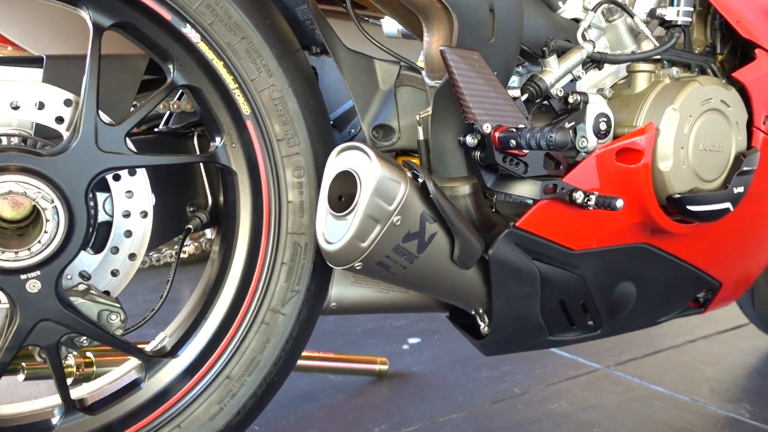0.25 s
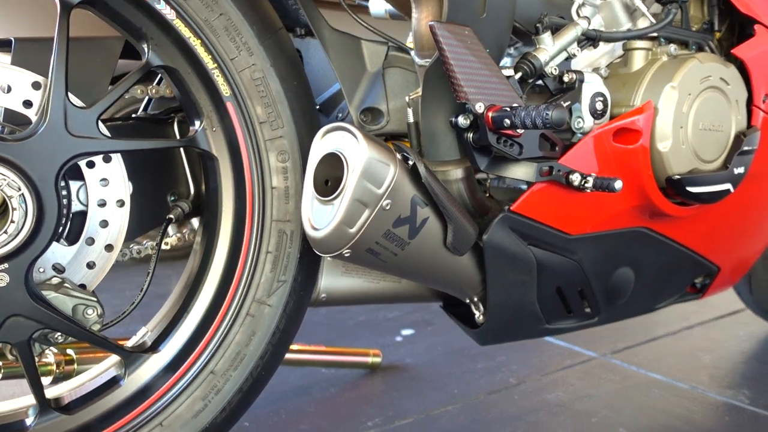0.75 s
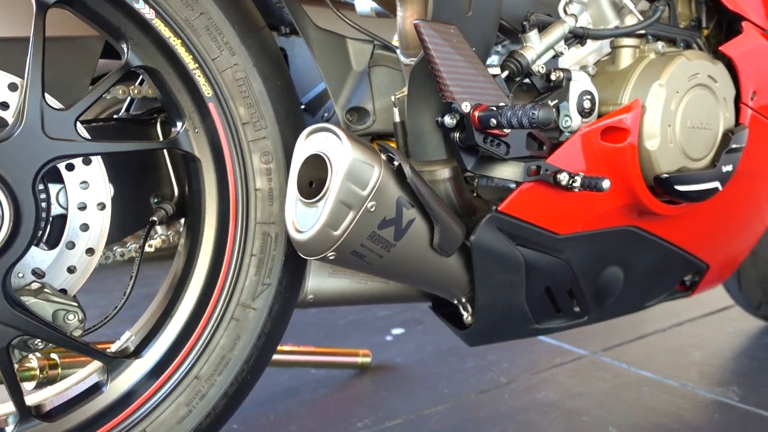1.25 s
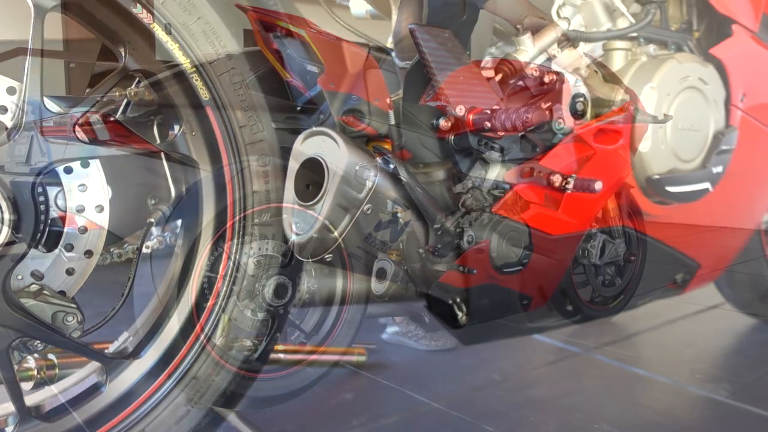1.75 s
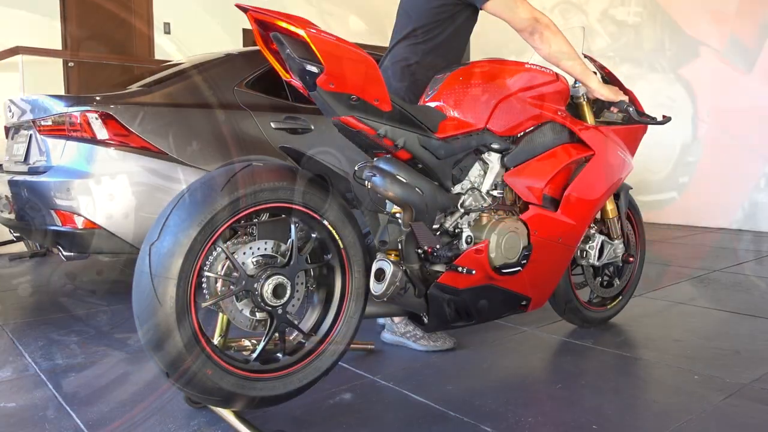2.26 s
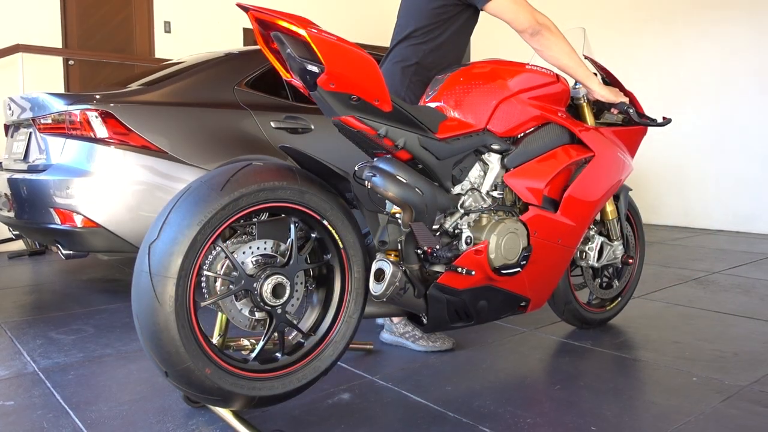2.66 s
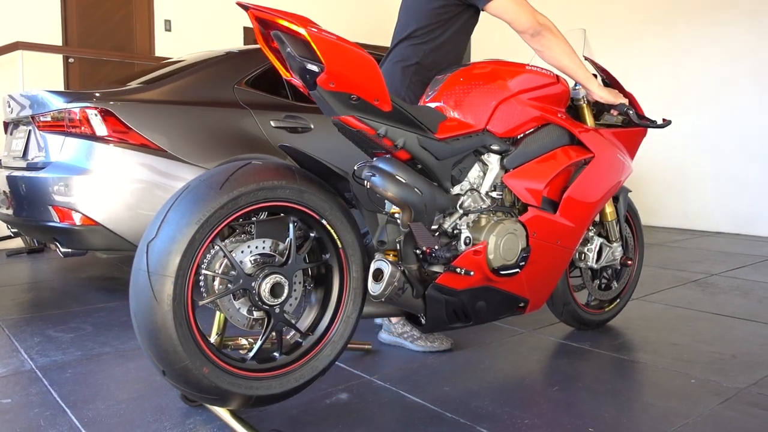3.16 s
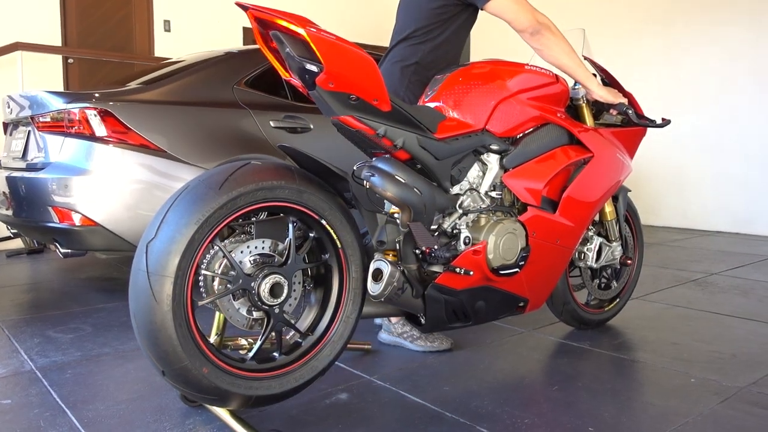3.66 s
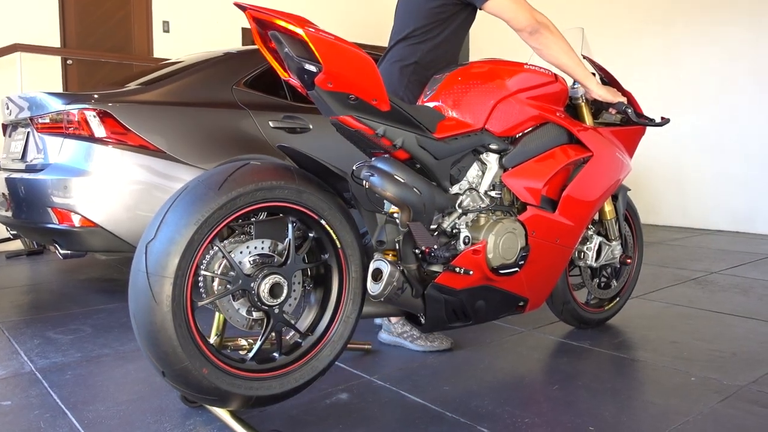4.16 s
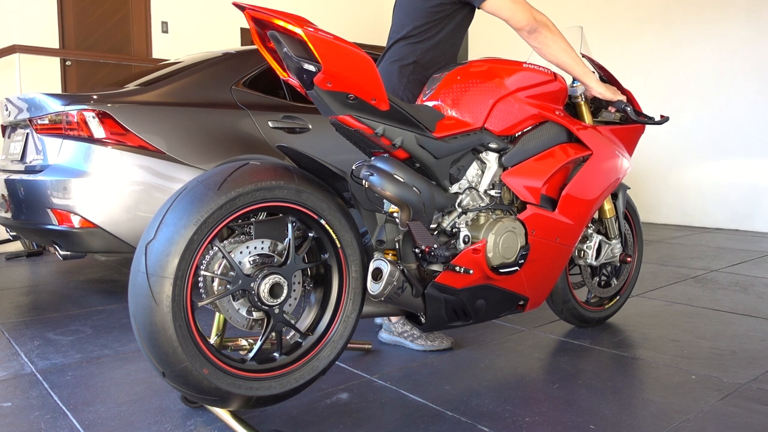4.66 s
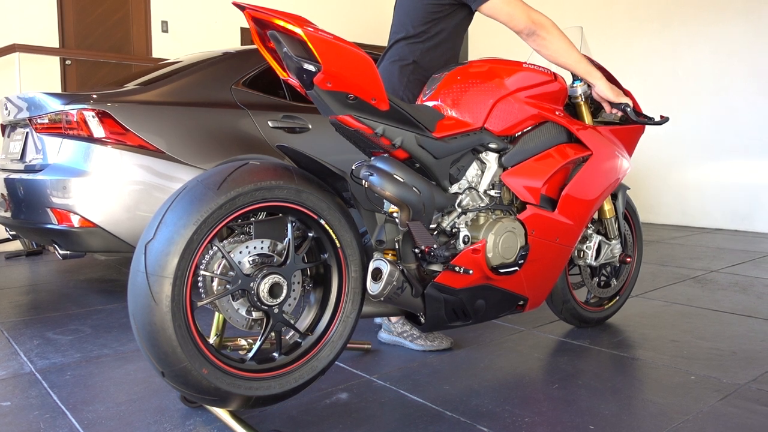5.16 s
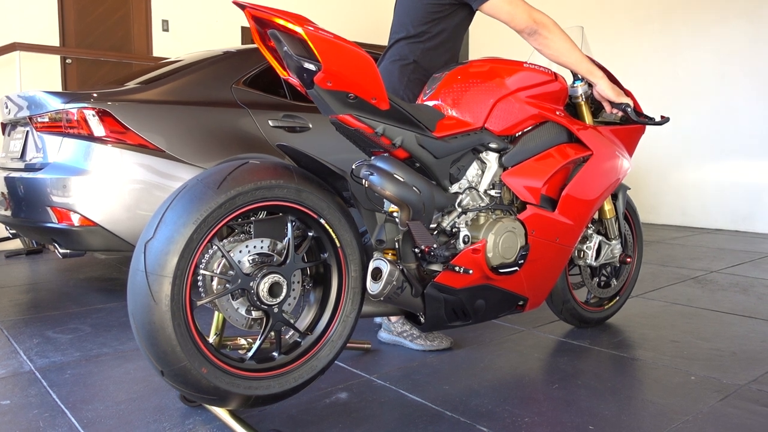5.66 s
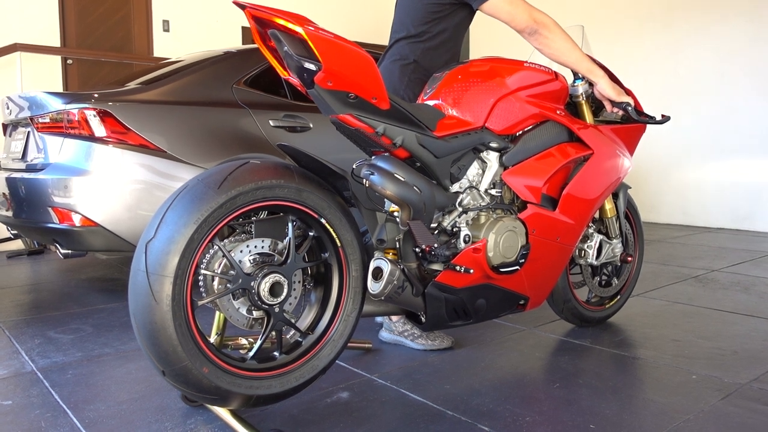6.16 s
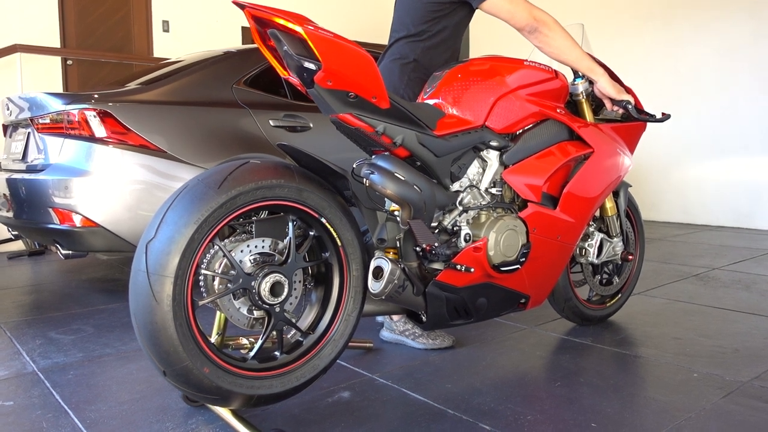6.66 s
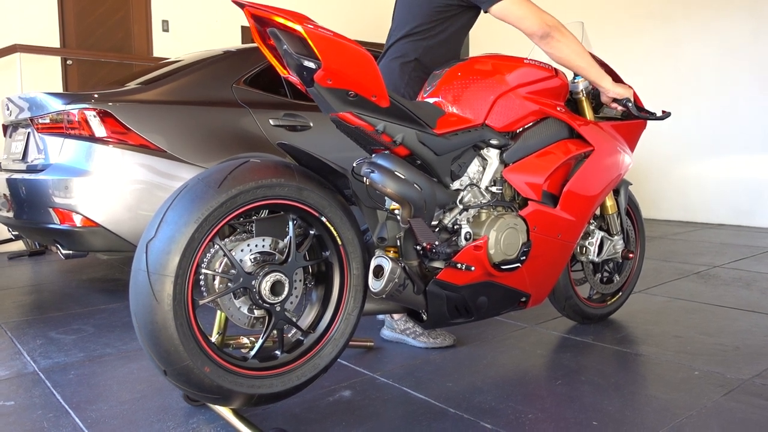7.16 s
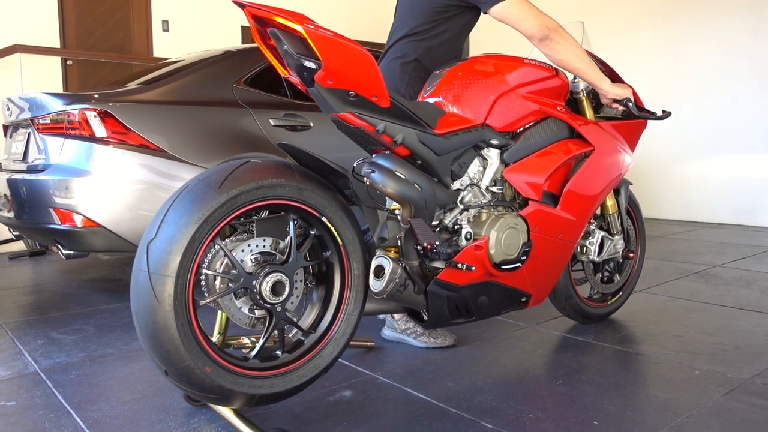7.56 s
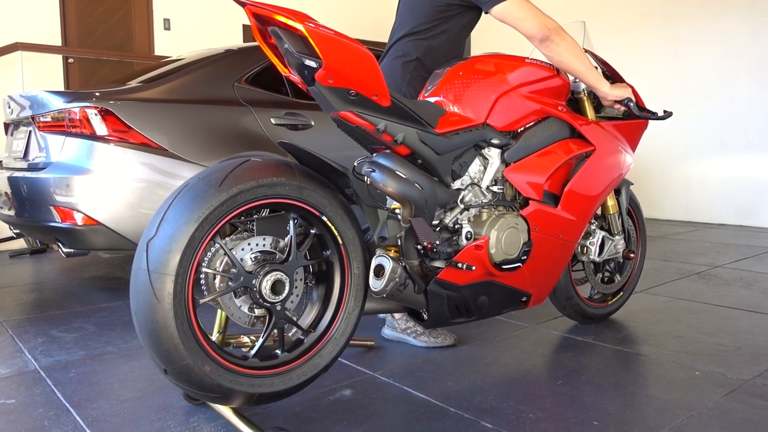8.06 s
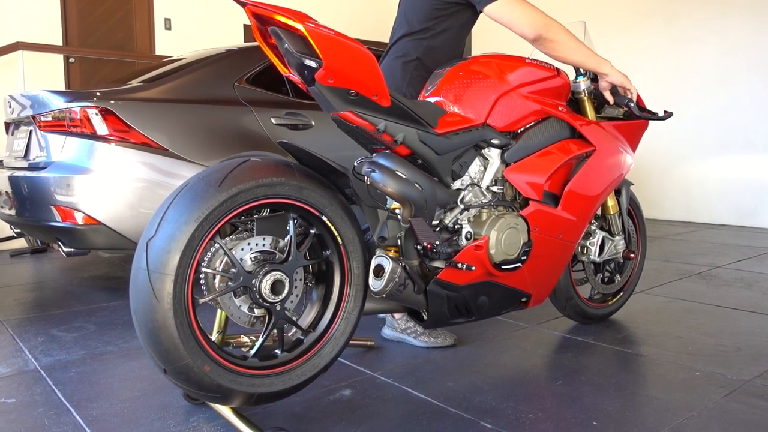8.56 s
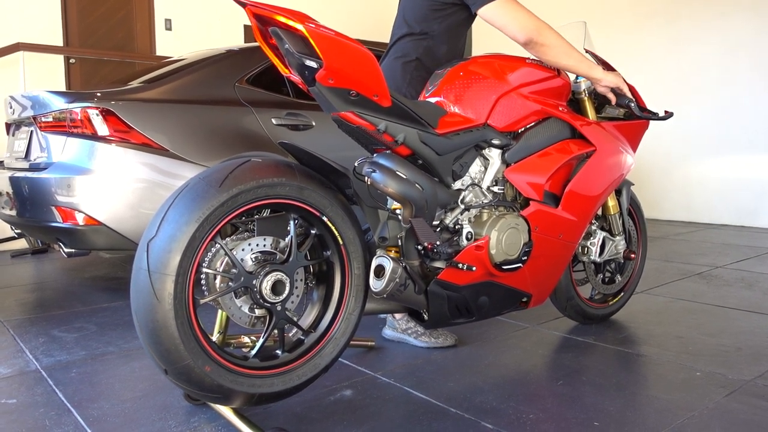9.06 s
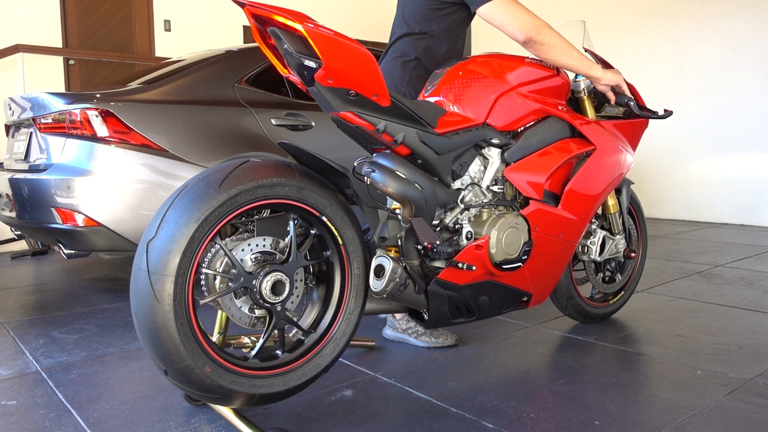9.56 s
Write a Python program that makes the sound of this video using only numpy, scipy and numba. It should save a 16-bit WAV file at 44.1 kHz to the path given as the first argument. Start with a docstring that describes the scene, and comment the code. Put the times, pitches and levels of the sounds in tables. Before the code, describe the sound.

Inside an open, echoing garage: first a close exhaust idle, deep and lumpy with metallic ticking, fading to a low wash of far street noise and tiny chirps. Then a hard clack and about a second of shrill, surging starter grind. The engine fires, idles quickly, eases down and nearly falters. One fast throttle blip rises and drops away, with a brief dip before the uneven idle resumes at a slightly greater distance.

```python
"""A V4 motorcycle idles close by in an open garage and fades to far street noise with two faint chirps.
A solenoid clacks, a grinding starter cranks the engine through three cycles of four compressions, it catches.
It settles to a lumpy idle, is blipped once, almost stumbles and idles on, now heard from farther off.
Four uneven firings a cycle excite silencer resonances; at fixed crank angles valve gear noise swells and ticks."""
import sys
import numpy as np
from scipy import signal
from scipy.fft import next_fast_len
from scipy.io import wavfile
from scipy.ndimage import uniform_filter1d
from numba import njit

SR = 44100
rng = np.random.default_rng(int(sys.argv[2]) if len(sys.argv) > 2 else 0)


def wav_out(sig):
    """Save sig, one row per channel (or a flat mono array), as 16-bit PCM at SR to the path in sys.argv[1]."""
    wavfile.write(sys.argv[1], SR, np.round(np.clip(np.atleast_2d(sig).T, -1, 1) * 32767).astype(np.int16))


N = 433062
TIME = np.arange(N) / SR   # s
NEAR_UNTIL_S, CATCH_S = 2.1, 4.42   # end of the close hearing; the engine fires by itself
IDLE_SPEED, SLOWEST_FIRING = 14, 9   # cycles per s; a cycle is two crank turns


def from_db(db):
    """Decibel law: level to amplitude gain."""
    return 10 ** (np.asarray(db) / 20)


def rms_one(x):
    """Power normalisation: scale to rms 1."""
    return x / np.sqrt(np.mean(x ** 2) + 1e-20)


def filtered(x, order, hz, kind="low"):
    """Butterworth filtering: flat in the passband."""
    return signal.sosfilt(signal.butter(order, hz, kind, fs=SR, output="sos"), x)


def in_time(rows):
    """Linear interpolation: each column of a curve table, sample by sample."""
    t, *columns = np.transpose(rows)
    return [np.interp(TIME, t, column) for column in columns]


def at_hz(points, hz):
    """Logarithmic frequency scale: a spectrum read linearly along log f."""
    f, values = np.transpose(points)
    return np.interp(np.log(hz), np.log(f), values)


def drift(rate_hz):
    """Low-passed chance: a slow random signal of spread 1, computed at every 40th sample."""
    step = 40
    r = np.exp(-2 * np.pi * step * rate_hz / SR)
    white = rng.standard_normal(N // step + 2002)
    slow = signal.lfilter([1], [1, -2 * r, r * r], white)[2000:]   # past the filter's start
    return np.interp(np.arange(N) / step, np.arange(len(slow)), rms_one(slow))


def resonate(x, modes):
    """Modal superposition: parallel two-pole resonances, signs alternating."""
    out = 0
    for k, (hz, width, level_db) in enumerate(modes):
        r = np.exp(-np.pi * width / SR)
        b = (1 - r * r) / 2 * np.array([1, 0, -1])
        a = [1, -2 * r * np.cos(2 * np.pi * hz / SR), r * r]
        out = out + (-1) ** k * from_db(level_db) * signal.lfilter(b, a, x + 1e-18)
    return out


@njit
def gliding_resonance(x, turn, r):
    """Time-varying resonance: a two-pole whose pitch (radians per sample) moves."""
    out = np.zeros(len(x))
    for i in range(2, len(x)):
        out[i] = x[i] - x[i - 2] + 2 * r * np.cos(turn[i]) * out[i - 1] - r * r * out[i - 2]
    return out


# interaural likeness of diffuse noise: [f/Hz, left-right correlation]
LIKENESS = [(60, 1), (180, 1), (550, 0.94), (1650, 0.79), (4970, 0.37), (15000, 0.2)]


def banded_noise(spectrum, patchy_db, low_hz):
    """Band synthesis: 0.4-octave stereo noises, each with its level, flicker and correlation; rms 1."""
    out = 0
    edges = low_hz * 2 ** np.arange(0, np.log2(19000 / low_hz), .4)
    white = rng.standard_normal((2, 2, N))
    for k, (low, high) in enumerate(zip(edges, edges[1:])):
        mid, side = filtered(white[k % 2], 2, [low, high], "band")   # neighbours use different noise
        hz = np.sqrt(low * high)
        alike = np.clip(at_hz(LIKENESS, hz), -1, 1)
        gain = from_db(at_hz(spectrum, hz) + patchy_db * drift(21.4))
        out = out + gain * (np.sqrt(1 + alike) * mid + np.sqrt(1 - alike) * side * [[1], [-1]])
    return rms_one(out)


def beats(cycles, shares, levels_db, uneven_db, jitter):
    """Periodic impulses: a click per cycle at each share, each with its own strength and slip."""
    whole = np.arange(np.floor(cycles[0]), np.ceil(cycles[-1]))[:, None]
    luck = rng.standard_normal((len(whole), 2, len(shares)))
    at = np.interp(whole + shares + jitter * luck[:, 0], cycles, np.arange(N), N, N).astype(int)
    clicks = np.zeros(N + 1)
    clicks[at] = from_db(np.array(levels_db) + uneven_db * luck[:, 1])
    return clicks[:N]   # clicks outside the sound fell on the extra sample


def whistles(rows, width_at_2khz, clean):
    """Narrow-band modulation: short gliding tones, loudest near the start, noisier in width when higher."""
    out = np.zeros((2, N))
    shared = clean + drift(width_at_2khz) + 1j * drift(width_at_2khz)
    waver = shared + .5 * (drift(width_at_2khz) + 1j * drift(width_at_2khz)) * [[1], [-1]]
    for start, end, from_hz, to_hz, level_db in rows:
        a, b = int(start * SR), int(end * SR)
        along = np.linspace(0, 1, b - a)
        shape = np.clip(along / 0.035, 0, 1) * (1 - along) ** .5
        turns = np.cumsum(from_hz + (to_hz - from_hz) * np.sqrt(along)) / SR
        read = a + (np.arange(b - a) * from_hz / 2000).astype(int)   # faster waver for higher tones
        tone = (waver[:, read] * np.exp(2j * np.pi * turns)).real
        out[:, a:b] += from_db(level_db) * shape * tone
    return out


def voice(base_db, rule, speed):
    """Power law of speed: an engine voice offset for each stage, rising per octave except on the starter."""
    near_db, crank_db, far_db, octave_db = rule
    rise_db = octave_db * np.log2(np.maximum(speed, SLOWEST_FIRING) / IDLE_SPEED)
    after_near_db = np.where(TIME < CATCH_S, crank_db, far_db + rise_db)
    return base_db + np.where(TIME < NEAR_UNTIL_S, near_db + rise_db, after_near_db)


OVERRUN_SLOWING = 33   # loss of speed, cycles per s each s, that counts as fully shut


def throttle_shut(speed):
    """Deceleration as load: 0 to 1, how fully the engine is slowing on a shut throttle."""
    slowing = -np.gradient(speed) * SR
    return uniform_filter1d(np.clip(slowing / OVERRUN_SLOWING, 0, 1) ** 2, size=2000)


# blasts leaving the pipes, one entry a cylinder: [share of the cycle] and [relative level/dB]
FIRING_SHARES = [0, .125, .392, .517]
FIRING_DB = [0.5, -5.5, -3.5, -1]
# strongest low note under power; above 17 cycles per s it is a firing harmonic:
# [engine speed/cycles per s, f/Hz]
BOOM_NOTE = [(3, 156.3), (9, 152.6), (12, 161.5), (14, 175.8), (17, 198.4), (19.5, 146), (25, 154),
             (34, 173)]
BOOM_WIDTH_HZ, OVERRUN_NOTE_HZ = 35, 159.6   # the second is the low note on a shut throttle
# pipe resonances, low to high: [f/Hz, width/Hz, relative level/dB]
THUMP_MODES = [(69.8, 10, 1.9), (112.2, 19.6, 1.3)]
BARK_MODES = [(264.5, 13.5, 3), (316.5, 55.5, -0.5), (383, 58, -3.5)]
RASP_MODES = [(438, 65, 1), (560, 65, 3), (640, 93, 0.5), (950, 760, -12.5)]
# resonance heard only close to the outlets: [f/Hz, width/Hz, relative level/dB]
NEAR_MODES = [(449, 23, 0)]
NEAR_NOTE_DB = -12   # over the bark
# clean tones: [multiple of the cycle rate] and [relative level/dB]
DRONE_ORDERS = [5, 7, 8, 10]
DRONE_ORDERS_DB = [0.5, -7, -10.5, -5]


def exhaust(cycles, boom_db, drone_db, thump_db, bark_db, rasp_db):
    """Source and resonator: each firing pushes a slug of turbulent gas into the silencer."""
    speed = np.gradient(cycles) * SR
    clicks = beats(cycles, FIRING_SHARES, FIRING_DB, uneven_db=3.0, jitter=0.0061)
    firings = clicks / np.sqrt(speed)   # power free of speed
    # air rushes while an exhaust valve is open; slow cranking blows more than it blasts
    valves_open = sum(from_db(db) * ((cycles - share) % 1 < .12)
                      for share, db in zip(FIRING_SHARES, FIRING_DB))
    rush = .35 * (14 / speed) ** .6
    gas = rush * rms_one(valves_open * rng.standard_normal(N)) - rms_one(firings)

    shut = throttle_shut(speed)
    note_hz = (1 - shut) * np.interp(speed, *np.transpose(BOOM_NOTE)) + shut * OVERRUN_NOTE_HZ
    turn, r = 2 * np.pi * note_hz / SR, np.exp(-np.pi * BOOM_WIDTH_HZ / SR)
    boom = rms_one(gliding_resonance(gas, turn, r))
    boom += 0.48 * rms_one(gliding_resonance(boom, turn, r))   # a second chamber sharpens the note
    envelope = np.abs(signal.hilbert(boom, next_fast_len(N))[:N])
    boom /= (1 + (envelope / 0.55) ** 2) ** 0.32   # loud swings are evened out
    boom = filtered(boom, 2, 330)   # packing wool swallows the blast's edge

    drone = 0
    for order, db in zip(DRONE_ORDERS, DRONE_ORDERS_DB):
        tone = np.sqrt(2) * np.cos(2 * np.pi * order * (cycles - .1))
        drone = drone + from_db(db + 1.5 * drift(8)) * tone
    layers = from_db(boom_db) * rms_one(boom) + from_db(drone_db - 2.5) * drone

    swirl = rng.standard_normal(N)   # steady turbulence at the outlets roughens the higher notes most
    pipes = [(THUMP_MODES, thump_db - 0.5, .2), (BARK_MODES, bark_db, .8), (RASP_MODES, rasp_db - 8.5, 2.5)]
    for modes, level_db, rough in pipes:
        layers += from_db(level_db) * rms_one(resonate(gas + rough * swirl, modes))
    near = from_db(bark_db + NEAR_NOTE_DB) * (TIME < NEAR_UNTIL_S)
    layers += near * rms_one(resonate(gas + 1.1 * swirl, NEAR_MODES))
    return filtered(layers, 2, [45, 1200], "band")


GARAGE_T60_S = 0.88   # time to decay by 60 dB


def garage(x):
    """Diffuse reverberation: convolution with exponentially dying noise, its own for each ear."""
    tail = np.arange(int(.6 * SR)) / SR
    decay = from_db(-60 * tail / GARAGE_T60_S) * (tail > .006)
    echoes = rng.standard_normal((2, len(tail))) * decay
    echoes = echoes / np.sqrt(np.sum(echoes ** 2, axis=1, keepdims=True))
    return signal.fftconvolve(x[None], echoes, axes=1)[:, :N]


# valve gear swells: [share of the cycle, spread/share, rise over the steady rattle/dB]
CLATTER_SWELLS = [(0.93, 0.064, 4.5), (0.31, 0.15, 3), (0.32, 0.01, 4), (0.53, 0.022, 2)]
# rattle spectrum: [f/Hz, relative level per Hz/dB]
CLATTER_SPECTRUM = [(290, 9), (500, -18.5), (819, -5), (893, -16), (1090, -9.5), (1250, -12.5),
                    (1400, -18.5), (1720, -6.5), (2360, -9.5), (2980, -15), (4030, -15), (8450, -31),
                    (16000, -34)]
# valves seating: [share of the cycle, relative level/dB]
VALVE_SEATINGS = [(0.0, -8), (.14, -7), (.4, -16), (0.541, -6.5)]


def valve_gear(cycles, clatter_db, tick_db):
    """Impact noise: rattle swelling at fixed crank angles, and sharp ticks of seating valves."""
    whole = np.floor(cycles).astype(int) + 1
    swell_db = 0
    for share, spread, level_db in CLATTER_SWELLS:
        away = (cycles - share + .5) % 1 - .5
        cycle_index = np.floor(cycles - share + .5).astype(int) + 1
        luck = 1 + 0.25 * rng.standard_normal(whole[-1] + 2)[cycle_index]
        swell_db = swell_db + level_db * luck * np.exp(-.5 * (away / spread) ** 2)
    noise = banded_noise(CLATTER_SPECTRUM, patchy_db=1.65, low_hz=350.7)
    rattle = from_db(clatter_db) * rms_one(from_db(swell_db) * noise)
    rattle = filtered(rattle, 2, 700, "high")   # small parts radiate little bass

    share, level_db = np.transpose(VALVE_SEATINGS)
    clicks = beats(cycles, share, level_db, uneven_db=4.5, jitter=0.0092)
    burst = signal.lfilter([1], [1, -np.exp(-1 / (0.0034 * SR))], clicks)   # 3.4 ms decay
    ticks = rms_one(filtered(burst * rng.standard_normal((2, N)), 2, 6000, "high"))
    return rattle * from_db([[-.7], [.7]]) + from_db(tick_db + 1.5) * ticks


# traffic level: [t/s, level/dB]
STREET_LEVEL = [(1.5, -50), (1.9, -31.5), (2.2, -22.5), (2.6, -20.5), (3.0, -19.5), (3.23, -20), (3.4, -22),
                (4.4, -28.5), (4.6, -37)]
# traffic spectrum: [f/Hz, relative level per Hz/dB]
STREET_SPECTRUM = [(15, -40), (25, -2.5), (82, -2), (130, -1.5), (229, 1.5), (309, -3), (373, -3),
                   (936, -2), (1190, -14), (1700, -10), (2350, -22), (3720, -14.5), (4030, -23),
                   (10700, -36.5), (16000, -44)]
# faint far chirps: [start t/s, end t/s, start f/Hz, end f/Hz, level/dB]
CHIRPS = [(2.09, 2.275, 3860, 3920, -43), (2.94, 3.06, 3780, 3800, -43)]


def street():
    """Incoherent sum of far sources: traffic noise through the open door, with two faint chirps."""
    noise = banded_noise(STREET_SPECTRUM, patchy_db=0.5, low_hz=23.54)
    traffic = from_db(in_time(STREET_LEVEL)[0]) * noise
    return traffic + whistles(CHIRPS, width_at_2khz=17, clean=1.3)


SURGE_S = 0.013   # rising time


def swell(start):
    """Critically damped response: quick rise to 1 after a start time, slower fall."""
    along = np.maximum(TIME - start, 0) / SURGE_S
    return along * np.exp(1 - along)


# solenoid clack: [t/s, relative level/dB]
SOLENOID = [(3.237, 16)]
STARTER_S, LET_GO_S = (3.24, 4.42), 0.08   # engaged from, to; fading time
GRIND_DB, STRAIN_TREBLE_DB = -16.5, 1.5   # grind level; extra treble straining through the first turn
# gear grind spectrum: [f/Hz, relative level per Hz/dB]
GRIND_SPECTRUM = [(180, -52), (300, -32), (354, -30), (634, -3), (1230, -4), (1930, 2.5), (3030, -8),
                  (3640, 1), (4590, -7.5), (8220, -22), (9240, -27), (13100, -34), (16000, -41)]
# starter case resonances: [f/Hz, width/Hz, relative level/dB]
CASE_MODES = [(1910, 83, 4), (2420, 120, 2.5), (2705, 150, 3), (3496, 51, 3.5), (3780, 57, 3),
              (7350, 180, -10.5), (8120, 260, -12.5)]
# resonance colouring the grind's treble: [f/Hz, width/Hz, relative level/dB]
SCREECH_MODES = [(13400, 1300, 0)]
# tones while the gears get up to speed: [start t/s, end t/s, start f/Hz, end f/Hz, level/dB]
SPIN_UP = [(3.3, 3.34, 7400, 7100, -27), (3.36, 3.42, 8250, 8350, -35), (3.36, 3.5, 7400, 6700, -27),
           (3.42, 3.62, 3500, 3500, -19), (3.44, 3.5, 6000, 5660, -23)]
# first compression of each engine cycle: [t/s, relative level/dB]
FIRST_COMPRESSIONS = [(3.53, -1), (3.875, -2.5), (4.21, -2)]
# gears racing over each of a cycle's four tops:
# [t after the first compression/s, relative grind level/dB, relative treble level/dB]
SURGES = [(-.008, -8, 8), (.062, -7, 1), (.134, -2, 2), (.188, -5, 2)]
# gears singing in each cycle:
# [start t after the first compression/s, end t after it/s, start f/Hz, end f/Hz, relative level/dB]
SONG = [(0, 0.087, 8440, 7870, -26), (.01, 0.118, 3830, 3660, -19.5), (.015, 0.17, 1927, 1925, -24.5),
        (.065, .12, 8400, 8150, -30), (.17, 0.254, 3600, 3740, -19.5)]


def starter():
    """Gear-mesh excitation: teeth grind, surge over compressions, ring the case and sing; a clack comes first."""
    start, end = STARTER_S
    engaged = (TIME > start) * np.clip(1 - (TIME - end) / LET_GO_S, 0, 1)
    surge, shrill = sum(from_db(db + np.array(top_db))[:, None] * swell(t + after)
                        for t, db in FIRST_COMPRESSIONS for after, *top_db in SURGES)
    mid, side = rng.standard_normal((2, N)) * from_db(2.0 * drift(34))
    teeth = mid + .5 * side * [[1], [-1]]
    case_ring = from_db(-3) * rms_one(resonate(teeth, CASE_MODES))
    grind = banded_noise(GRIND_SPECTRUM, patchy_db=2.0, low_hz=255.0) + case_ring
    treble = filtered(grind, 2, 5500, "high")
    treble = treble + resonate(treble, SCREECH_MODES)
    strain = from_db(STRAIN_TREBLE_DB) * (TIME < FIRST_COMPRESSIONS[0][0])
    grind = grind * (1 + surge) + treble * (shrill + strain)

    song = SPIN_UP + [(t + a, t + b, from_hz, to_hz, db + note_db)
                      for t, db in FIRST_COMPRESSIONS for a, b, from_hz, to_hz, note_db in SONG]
    singing = whistles(song, width_at_2khz=20, clean=0.47)

    (at, peak_db), = SOLENOID
    since = TIME - at
    decay = (since > 0) * np.exp(-np.abs(since) / 0.006)
    clack = signal.lfilter([.5, 0, -.5], [1, -.5], rng.standard_normal(N))
    clack = from_db(peak_db - 29) * decay * clack
    return (from_db(GRIND_DB) * engaged * grind + singing + clack) * from_db([[-.5], [.5]])


def overrun_hiss(speed):
    """High-passed noise: a thin treble hiss while the throttle is shut, once the engine has caught."""
    hiss = filtered(rng.standard_normal((2, N)), 2, 8000, "high")
    return from_db(-37) * throttle_shut(speed) * (TIME > CATCH_S) * hiss


# engine speed: [t/s, speed/cycles per s]; inaudible from about 2.3 s until the starter turns it
SPEED = [(0, 14.26), (.46, 14.03), (.8, 15.57), (1.47, 15.15), (1.78, 13.65), (2.25, 13.77), (2.3, 2.68),
         (3.3, 2.97), (4.36, 2.97), (4.47, 6.5), (4.58, 11.76), (4.85, 16.99), (5.35, 16.85), (5.7, 14.37),
         (6.26, 13.92), (7.0, 11.76), (7.72, 11.32), (8.07, 22.41), (8.3, 36.44), (8.5, 21.07), (8.7, 14.4),
         (8.97, 13.74), (9.82, 12.95)]
FIRST_CYCLE = -.93   # crank position at the start, in cycles
# engine levels: [t/s, silencer boom level/dB, valve clatter level/dB]
ENGINE_LEVELS = [(0, -12.5, -29), (.4, -14, -28), (1.0, -12.5, -27.5), (1.55, -12.5, -27.5),
                 (1.95, -21, -34.5), (2.15, -29.5, -43), (2.35, -82, -80), (3.3, -78, -80),
                 (3.45, -29, -40), (3.6, -23.5, -47), (4.4, -22, -29), (4.44, -13.5, -26),
                 (4.48, -8, -17.5), (4.56, -7.5, -22), (5.5, -9, -25.5), (6.5, -10, -26), (6.9, -11, -26),
                 (7.85, -9.5, -25), (8.0, -8.5, -25), (8.22, -11.5, -24.5), (8.33, -18, -21),
                 (8.41, -15.5, -22.5), (8.49, -14, -23.5), (8.7, -18.5, -29), (8.8, -28, -32.5),
                 (8.86, -7.5, -26.5), (8.95, -12.5, -27.5), (9.1, -11, -28), (9.82, -11, -26)]
# voices over the boom (ticks over the clatter), before fixed trims where they are played:
# [near level/dB, on the starter level/dB, far level/dB, rise per octave of speed/dB]; near, far at idle speed
DRONE_RULE = (-22, -50, -21.5, 15.5)
THUMP_RULE = (-4.5, -6, -9, 2)
BARK_RULE = (-9.5, -12, -12, 10)
RASP_RULE = (-14.5, -25, -15.5, 17.5)
TICK_RULE = (-15.5, -11, -22, 2.5)
GARAGE_DB = -13   # wall echoes against the direct sound


def scene():
    """Superposition: engine with its echoes, street and starter add."""
    speed, = in_time(SPEED)
    cycles = FIRST_CYCLE + np.cumsum(speed) / SR
    boom_db, clatter_db = in_time(ENGINE_LEVELS)
    rules = (DRONE_RULE, THUMP_RULE, BARK_RULE, RASP_RULE)
    pipe = exhaust(cycles, boom_db, *[voice(boom_db, rule, speed) for rule in rules])
    walls = filtered(garage(pipe), 4, 130, "high")   # deep bass escapes by the door
    engine = pipe * from_db([[-.3], [.3]]) + from_db(GARAGE_DB) * walls
    valves = valve_gear(cycles, clatter_db, voice(clatter_db, TICK_RULE, speed))
    return engine + valves + street() + starter() + overrun_hiss(speed)


def record(dry):
    """Saturation and band limiting: peaks are rounded, then the top is cut at 15950 Hz."""
    rounded = 1.08 * np.tanh(dry / 0.94)
    return signal.sosfilt(signal.ellip(12, .5, 70, 15950, fs=SR, output="sos"), rounded)


dry = scene()
out = record(dry)
wav_out(out)
```